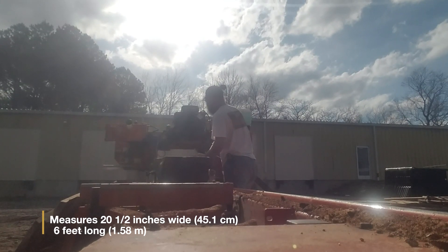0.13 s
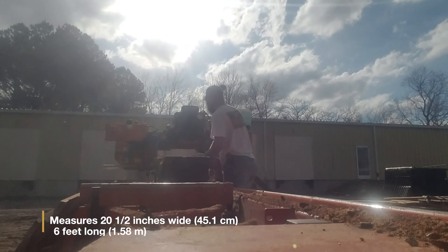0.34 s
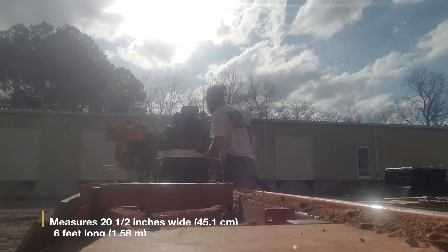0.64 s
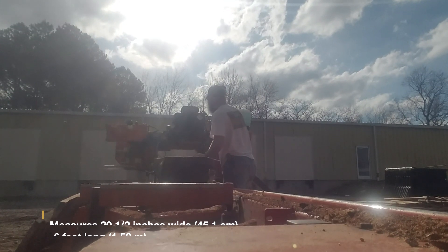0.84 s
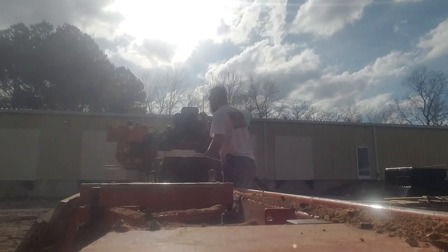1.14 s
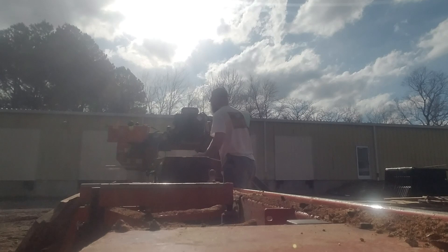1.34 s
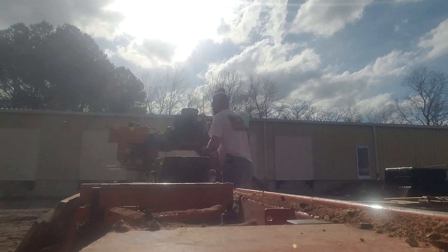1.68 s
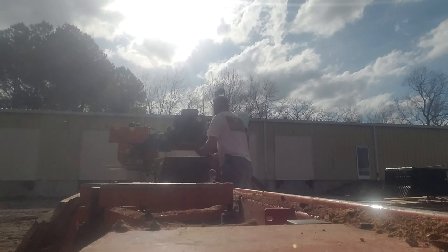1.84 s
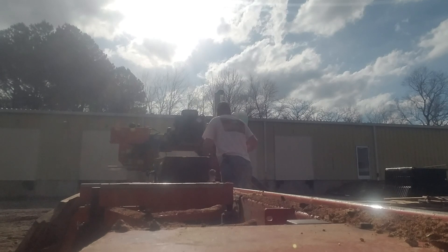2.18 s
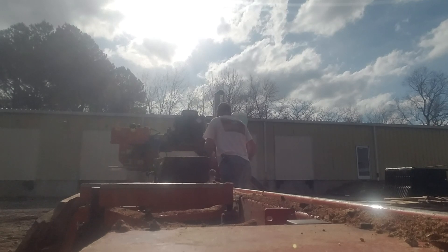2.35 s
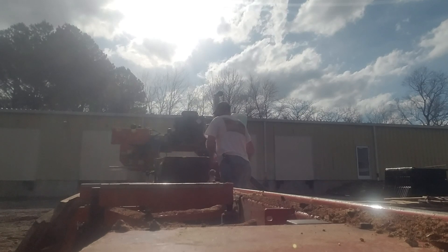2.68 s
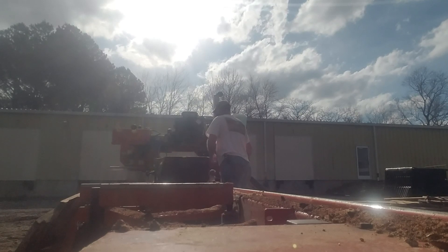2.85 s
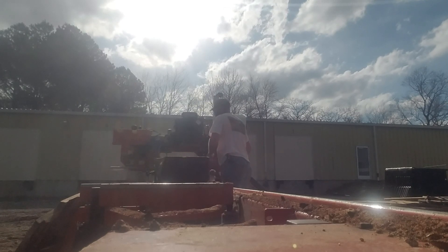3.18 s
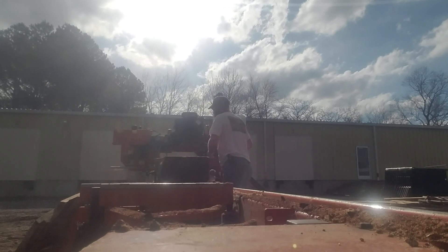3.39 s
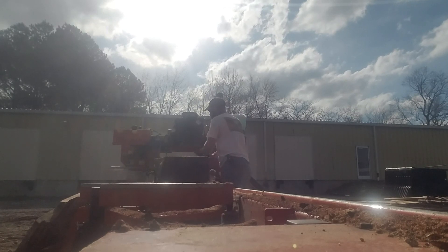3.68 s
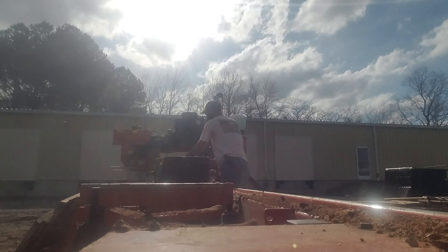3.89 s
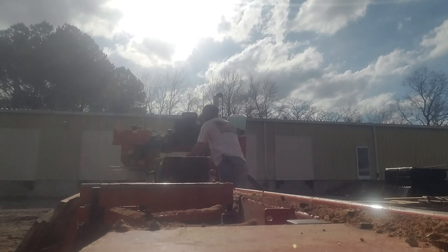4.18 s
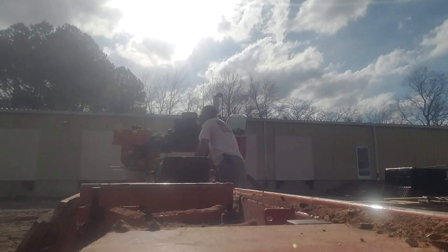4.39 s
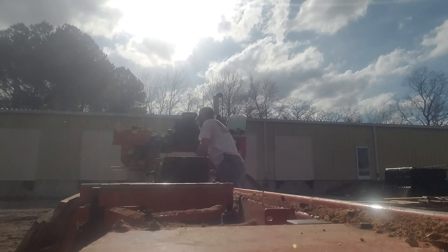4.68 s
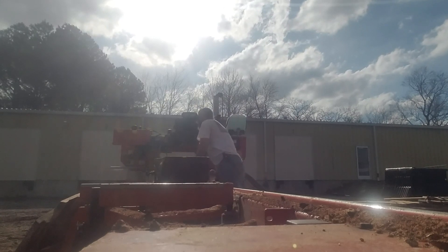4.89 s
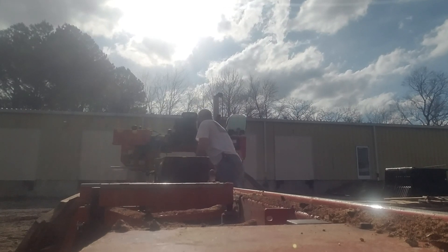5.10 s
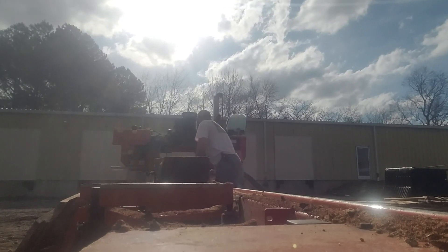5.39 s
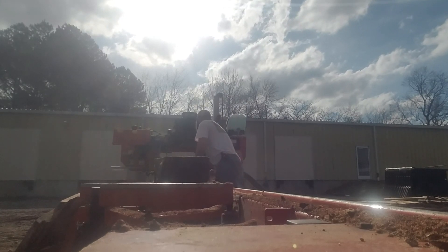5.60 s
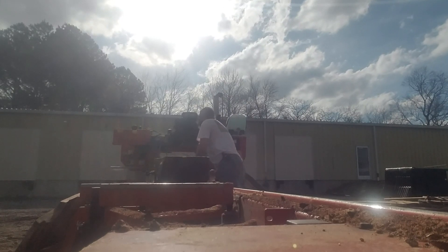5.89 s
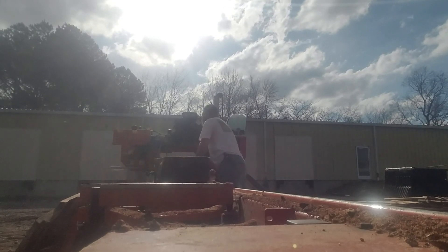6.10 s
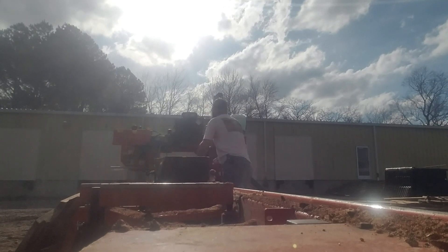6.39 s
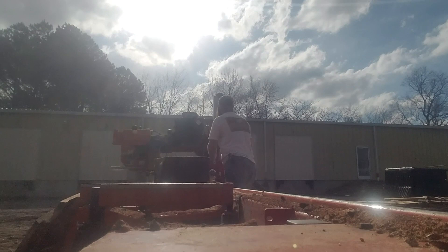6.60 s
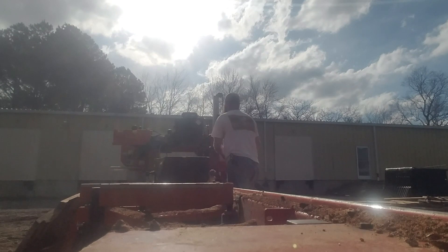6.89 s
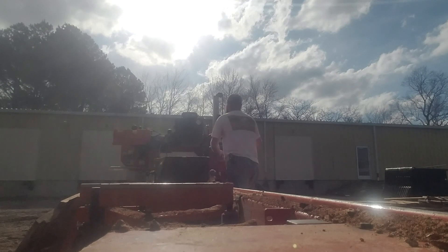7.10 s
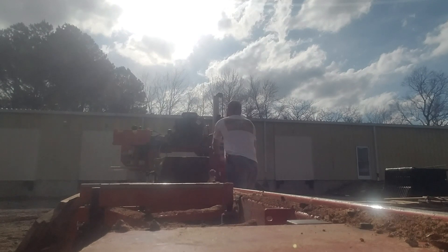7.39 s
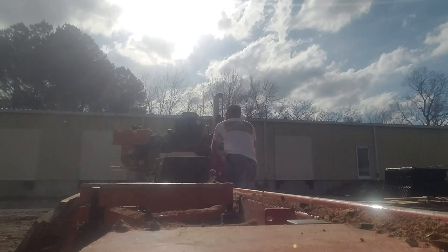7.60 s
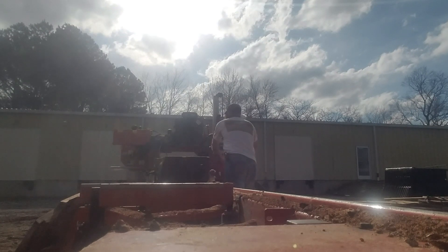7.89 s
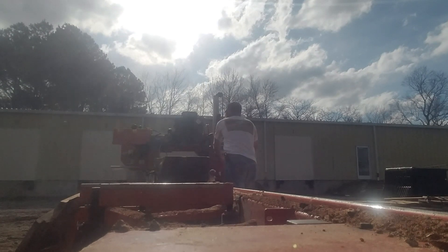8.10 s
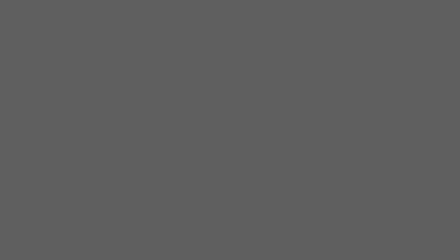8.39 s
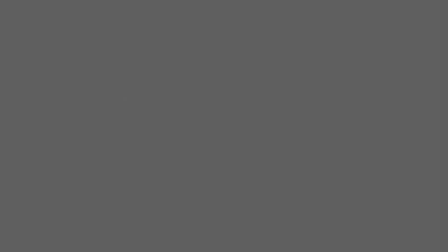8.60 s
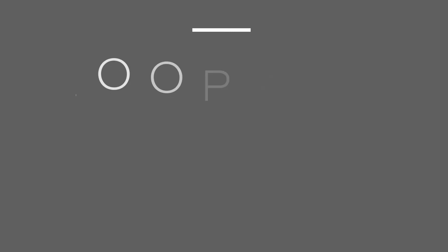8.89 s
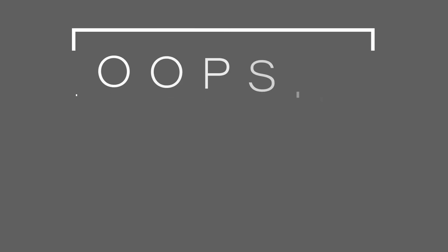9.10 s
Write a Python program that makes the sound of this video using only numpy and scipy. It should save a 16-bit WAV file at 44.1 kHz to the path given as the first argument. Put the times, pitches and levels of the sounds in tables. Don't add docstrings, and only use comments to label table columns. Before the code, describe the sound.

A small two-cylinder engine is already running hard outdoors, close to a compact stereo microphone: fluttering low exhaust, buzzing mid-range whine and broad airy roar. From 0 to 0.6 s its pitch sags slightly; hollow steel knocks rattle around 0.3 s and again near 0.65 s. It then surges, peaking about 1.1 s, while the blade enters the log and a bright sizzling hiss with coarser woody rasp grows. The throttle eases between 1.45 and 1.9 s and the pitch sinks until about 2.65 s, with short thin squeals near 1, 2.15 and 3.4 s. It climbs gently to 4.8 s, then holds nearly steady, with faint blade ringing. Teeth catch briefly around 5.3 s. Hiss strengthens near 7.1 s; the engine droops slightly from 8 s. A deeper knock lands at 8.3 s, and everything stops instantly at 8.34 s, leaving silence.

```python
import sys
import numpy as np
from scipy import signal
from scipy.fft import rfft, irfft, next_fast_len
from scipy.io import wavfile

SR = 44100
rng = np.random.default_rng(int(sys.argv[2]) if len(sys.argv) > 2 else 0)


def convert_level_to_amplitude(level_db):
    exponent = np.asarray(level_db, float) / 20
    return 10 ** exponent


def log_audio(samples):
    frames = np.atleast_2d(samples).T
    limited = np.clip(frames, -1, 1)
    pcm = np.round(limited * 32767).astype(np.int16)
    wavfile.write(sys.argv[1], SR, pcm)


N = 407921
SIZE = next_fast_len(N)


def rms_one(x):
    return x / np.sqrt(np.mean(x ** 2) + 1e-20)


def in_time(rows):
    s, values = np.transpose(rows)
    return np.interp(np.arange(N) / SR, s, values)


def drift(rate):
    r = np.exp(-80 * np.pi * rate / SR)
    noise = rng.standard_normal(N // 40 + 2002)
    slow = signal.lfilter([1], [1, -2 * r, r * r], noise)[2000:]
    return np.interp(np.arange(N) / 40, np.arange(len(slow)), rms_one(slow))


def port_table(levels, ports):
    hz = np.fft.rfftfreq(SIZE, 1 / SR) + 1e-3

    def read(table, column):
        rows = np.array(table)
        return np.interp(np.log(hz), np.log(rows[:, 0]), rows[:, column])

    return hz, read(levels, 1), read(levels, 2), read(ports, 1), read(ports, 2)


def to_ports(x, levels, ports):
    hz, left_db, right_db, alike, lead = port_table(levels, ports)
    tilt = convert_level_to_amplitude((left_db - right_db) / 2)
    return irfft(rfft(x, SIZE) * [tilt, np.exp(1j * lead) / tilt], SIZE)[:, :N]


def port_noise(levels, ports, edges_hz, patchy_db, gust_db, modes_db, diffuse, count):
    hz, left_db, right_db, alike, lead = port_table(levels, ports)
    alike = alike ** diffuse
    shared, own = rfft(rng.standard_normal((2, SIZE)))

    grid = np.arange(0, SR / 2 + 99, 45.)
    forest = []
    for _ in range(3):
        heights = np.minimum(rng.exponential(1, len(grid)), 2.6)
        forest.append(modes_db * np.interp(hz, grid, heights))
    left = convert_level_to_amplitude(left_db + forest[0] + 0.65 * forest[1]) * shared
    mixed = alike * np.exp(1j * lead) * shared + np.sqrt(1 - alike ** 2) * own
    right = convert_level_to_amplitude(right_db + forest[0] + 0.8 * forest[2]) * mixed

    low_hz, high_hz = edges_hz
    place = np.log(hz / low_hz) / np.log(high_hz / low_hz) * count
    out, gust = 0, gust_db * drift(4.3)
    for k in range(count + 1):
        window = np.clip(1 - abs(place - k), 0, 1) * (place > 0) * (place < count)
        band = irfft(window * [left, right], SIZE)[:, :N]
        out = out + convert_level_to_amplitude(gust + patchy_db * drift(8.1)) * band
    return out / np.sqrt(np.mean(out.mean(axis=0) ** 2))


# (t/s, level/dB)
FEED = [(0, -35), (.69, -35.5), (.76, -32.5), (1.16, -29.5), (2.13, -32), (2.85, -33.5), (3.3, -33),
        (5.2, -35.5), (6.2, -35), (7.1, -31), (7.4, -32), (8.33, -32)]
# (t/s, level/dB)
KNOTS = [
    (2.18, 1),
    (5.24, 3),
    (5.36, 4),
    (8.33, 1),
]


def load():
    t = np.arange(N) / SR
    throttle_db = 10 * np.clip(1 - (t - 1.45) / .43, 0, 1)
    free = np.clip(1 - (t - .79) / .8, 0, 1)
    catch_db = sum(db * np.clip(1 - abs(t - s) / .044, 0, 1) for s, db in KNOTS)
    return throttle_db, free, in_time(FEED) + catch_db


def follow(usual_db, throttle_share, free_db, feed_share):
    throttle_db, free, feed_db = load()
    return usual_db + throttle_share * throttle_db + free_db * free + feed_share * (feed_db + 33)


# (t/s, cycles per second)
SPEED = [(0, 26.72), (.2, 26.64), (.38, 26.3), (.62, 26.12), (.88, 27.8), (1.0, 28.5), (1.12, 28.78),
         (2.0, 27.16), (2.3, 26.81), (2.65, 26.55), (3.2, 26.84), (4.1, 27.62), (4.8, 28.02), (5.6, 27.65),
         (6.2, 27.47), (7.7, 27.38), (8.0, 27.16), (8.3, 26.75)]
# (multiple of the cycle, level/dB)
NOTES = [(2, -35.5), (14, -39), (16, -35.5), (17, -40.5), (18, -42.5), (19, -43), (20, -38), (22, -44),
         (28, -41.5), (29, -41), (32, -35), (39, -40), (40, -35), (42, -34), (43, -40.5), (44, -33.5),
         (46, -39), (48, -39)]
# (multiple of the cycle, level/dB)
QUIET_NOTES = [(1, -50.5), (7, -46.5), (11, -43), (15, -45.5), (25, -58), (31, -45), (45, -47.5),
               (55, -49.5)]
# (f/Hz, offset for 6 dB less/Hz, level/dB, share of throttle)
PIPE = [(78.85, 3, -33, 0.22), (112.8, 7.5, -33.5, 1.29), (131.7, 9.5, -31.5, .8),
        (162.6, 6.5, -34.5, 1.16)]
# (f/Hz, width/Hz, level/dB)
CASING = [(257, 6, 5), (278.4, 5.9, 3), (394.5, 14, 12), (441.2, 9.6, 8.5), (885, 28, 8), (1070, 20, -2),
          (1156, 20, 3.5), (1184, 25, 0.5)]


def engine(unsteady_db, wander_rad, lean_rad):
    step = 8
    cycles_per_s, throttle_db = in_time(SPEED)[::step], load()[0][::step]
    whine_db = follow(.5, -.23, -1, .77)[::step]
    turn = 2 * np.pi * np.cumsum(cycles_per_s) * step / SR
    wobble = [drift(3.1)[::step] for _ in range(12)]
    strong = dict(NOTES)

    out = convert_level_to_amplitude(-33.5 + 0.92 * wobble[0]) * np.cos(5.7 * turn + 0.37 * wobble[1])
    for k in range(1, 59):
        note_hz = k * cycles_per_s
        level_db = strong.get(k, np.interp(k, *np.transpose(QUIET_NOTES)))
        if 3 <= k <= 6:
            hz, off_hz, top_db, share = PIPE[k - 3]
            loss_db = np.minimum(6 * ((note_hz - hz) / off_hz) ** 2, 18.5)
            level_db = top_db + share * throttle_db - loss_db
        if k > 24:
            level_db = level_db + whine_db
        for hz, width_hz, lift_db in CASING:
            lift = lift_db / (1 + (2 * (note_hz - hz) / width_hz) ** 2)
            level_db = level_db + lift - 1.07 * lift.mean()
        start = lean_rad * k * k if k < 8 else rng.uniform(0, 2 * np.pi)
        wander = wander_rad * np.sqrt(k / 4) * wobble[(5 * k + 1) % 12]
        out += convert_level_to_amplitude(level_db + unsteady_db * wobble[k % 12]) * np.cos(k * turn + start + wander)
    return np.sqrt(2) * signal.resample_poly(out, step, 1)[:N]


# (t/s, peak level/dB, f/Hz, time to fall 60 dB/s)
KNOCKS = [
    (.266, -16, 258, .16),
    (.306, -9, 262, .2),
    (.348, -12, 268, .12),
    (.644, -15, 252, .16),
    (.682, -10.5, 272, .16),
    (8.305, -16, 155, .2),
]


def knocks():
    out, t = np.zeros(N), np.arange(SR // 4) / SR
    for s, peak_db, hz, t60 in KNOCKS:
        modes = np.sin(2 * np.pi * hz * t) + convert_level_to_amplitude(-5) * np.sin(2 * np.pi * 1.14 * hz * t)
        out[round(s * SR):][:len(t)] += convert_level_to_amplitude(peak_db - 60 * t / t60) * (1 - np.exp(-t / .003)) * modes
    return out


# (f/Hz, left level/dB, right level/dB)
ENGINE_LEVELS = [(25, -26, -20.5), (55.7, -4.5, -9), (95, -11, -9), (153, -4.5, -4.5), (201, -14, -12),
                 (326, -12, -10.5), (477, -3, -1.5), (713, -11, -11.5), (870, -6.5, -8.5), (1198, -3.5, -8),
                 (1304, -8, -15.5), (1620, -25.5, -11), (1780, -15, -12.5), (2300, -16.5, -15)]
# (f/Hz, likeness 0-1, right leads/rad)
ENGINE_PORTS = [(25, .73, -.1), (55, .73, -.3), (95, .9, -.2), (150, .97, -.2), (470, .98, -.3),
                (680, .94, -.35), (880, .96, -.25), (1150, .98, -.05), (1290, .93, .3), (1420, .75, 1.3),
                (1650, .4, 1.3), (1780, .75, -.9), (2000, .82, -.1), (2300, .79, .9)]


def motor():
    dry_motor = engine(unsteady_db=1.0, wander_rad=.15, lean_rad=.3106) + knocks()
    return to_ports(dry_motor, ENGINE_LEVELS, ENGINE_PORTS)


def engine_roar():
    roar = port_noise(ENGINE_LEVELS, ENGINE_PORTS, (350, 2300), patchy_db=.1, gust_db=.44,
                      modes_db=.88, diffuse=1.64, count=3)
    return convert_level_to_amplitude(follow(-22.5, .1477, 0, 0)) * roar


def rumble():
    low = port_noise(ENGINE_LEVELS, ENGINE_PORTS, (18, 350), patchy_db=.8, gust_db=.76,
                     modes_db=-1.5, diffuse=1.8, count=3)
    return convert_level_to_amplitude(follow(-28.5, .11, 2.5, -.57)) * low


# (f/Hz, left level/dB, right level/dB)
HISS_LEVELS = [(7540, -13, -14.5), (7950, -11, -5), (8500, -10, -3), (9200, -14, -5), (9600, -8, -8.5),
               (10100, -6.5, -13), (10800, -8, -10), (11600, -4.5, -11.5), (12300, -1.5, -8),
               (13000, -0.5, -5), (14000, 0.0, -6), (14840, -2, -7), (15300, -3, -7), (15720, -7.5, -4.5)]
# (f/Hz, likeness 0-1, right leads/rad)
HISS_PORTS = [(7600, 0.54, -0.0), (7950, 0.26, 1.6), (8500, 0.16, 4.4), (9000, 0.6, 3.7), (9600, 0.46, 3.7),
              (10100, 0.3, 5.1), (10800, 0.21, 3.7), (11600, 0.25, 3.3), (12300, 0.19, 1.7),
              (13000, 0.37, 2.2), (14000, 0.35, 1.3), (14700, 0.17, 1.3), (15300, 0.14, 0.7),
              (15700, 0.3, -0.5)]


def tooth_hiss():
    hiss = port_noise(HISS_LEVELS, HISS_PORTS, (7600, 15750), patchy_db=.9, gust_db=.16,
                      modes_db=2.7, diffuse=.83, count=2)
    top = signal.sosfiltfilt(signal.butter(2, 11500, "high", fs=SR, output="sos"), hiss)
    free, feed_db = load()[1:]
    return convert_level_to_amplitude(feed_db - .02) * (hiss - .4 * free ** 2 * top)


# (f/Hz, left level/dB, right level/dB)
RASP_LEVELS = [(2300, -4, 1), (2460, -7.5, -1), (2660, -13.5, -8.5), (2966, -7, -3), (3235, -9, -10.5),
               (3744, -7, -8), (4140, -6, -3), (4670, -7, -1.6), (5350, -5, -5), (5990, -16.5, -12),
               (6430, -9, -14), (6800, -14.5, -20), (7200, -14, -26.5), (7600, -16.5, -18.5)]
# (f/Hz, likeness 0-1, right leads/rad)
RASP_PORTS = [(2300, 0.75, 1.1), (2500, 0.68, 1.9), (2720, 0.79, 3.2), (3000, 0.67, 3.7), (3300, 0.79, 3.4),
              (3600, 0.58, 4.5), (4000, 0.61, 4.8), (4800, 0.6, 4.0), (5400, 0.45, 4.1), (5900, 0.44, 4.4),
              (6400, 0.22, 3.8), (6800, 0.17, 5.8), (7200, 0.11, 6.0), (7600, 0.19, 7.1)]


def cutting_rasp():
    rasp = port_noise(RASP_LEVELS, RASP_PORTS, (2300, 7600), patchy_db=.55, gust_db=.8,
                      modes_db=1.8, diffuse=.7, count=3)
    return convert_level_to_amplitude(follow(-36, -.02, 3, .43)) * rasp


# (t/s, length/s, f/Hz, level/dB)
SQUEALS = [(.98, .2, 4310, -40), (1.98, .12, 4330, -38), (3.3, .1, 4330, -40), (3.45, .18, 4330, -39),
           (2.1, .035, 4330, -32), (2.15, .06, 4330, -28), (2.23, .04, 4330, -40), (3.86, .12, 4870, -37),
           (3.9, .07, 5270, -38), (3.99, .07, 5270, -38), (6.9, .5, 6245, -44), (.44, .14, 700, -30)]


def squeals():
    out = np.zeros(N)
    for s, length, hz, level_db in SQUEALS:
        t = np.arange(round(length * SR)) / SR
        shape = np.sqrt(np.sin(np.pi * t / length))
        out[round(s * SR):][:len(t)] += convert_level_to_amplitude(level_db) * shape * np.sin(2 * np.pi * hz * t)
    return out


# (f/Hz, level/dB)
RINGS = [
    [(4307, -54), (5771, -52), (6239, -59.5), (8210, -51.5), (13087, -52), (14239, -54.5)],
    [(4829, -57), (8210, -55.5), (8899, -61), (11902, -65), (12274, -57), (13119, -59), (13792, -55),
     (14357, -53), (14443, -55), (15493, -57.5)],
    [(4845, -55), (5281, -52), (6245, -63.5), (8446, -56.5), (8904, -53), (11892, -59), (12285, -58.5),
     (13130, -55), (13964, -51.5), (14223, -56), (14438, -53), (14826, -55.5), (15149, -54.5), (15488, -57)],
]
RINGS_AT = [2.4, 4.8, 7.4]


def blade_rings(cut_db, width_hz, swell_db, fade_db):
    out, r, t = 0, np.exp(-np.pi * width_hz / SR), np.arange(N) / SR
    teeth = rng.standard_normal(N)
    swells = [convert_level_to_amplitude(swell_db * drift(1.7)) for _ in range(7)]
    for rings, at in zip(RINGS, RINGS_AT):
        near = convert_level_to_amplitude(cut_db - np.median(cut_db) - fade_db * (t - at) ** 2)
        for k, (hz, level_db) in enumerate(rings):
            poles = [1, -2 * r * np.cos(2 * np.pi * hz / SR), r * r]
            ring = signal.lfilter([1, 0, -1], poles, teeth)
            out = out + convert_level_to_amplitude(level_db + 3.5) * near * swells[k % 7] * rms_one(ring)
    return out


# (f/Hz, left level/dB, right level/dB)
BLADE_LEVELS = [(4300, -3.5, 1), (6200, 0.5, 5), (7200, -0.5, -4.5), (8920, 0.5, 5), (11900, -2, -2),
                (14400, 0.5, -7), (15300, 2, -1)]
# (f/Hz, likeness 0-1, right leads/rad)
BLADE_PORTS = [(700, 1, -.2), (4300, 1, -1.2), (9000, 1, -1.8), (14000, 1, 1.2)]


def blade():
    rings = blade_rings(load()[2], width_hz=25, swell_db=3.0, fade_db=.5)
    return to_ports(rings + squeals(), BLADE_LEVELS, BLADE_PORTS)


def scene():
    powered = motor() + engine_roar() + rumble()
    cutting = tooth_hiss() + cutting_rasp()
    return powered + cutting + blade()


def low_pass(x):
    return signal.sosfilt(signal.butter(12, 15740, fs=SR, output="sos"), x)


def record(dry):
    kept = np.clip((8.3376 - np.arange(N) / SR) / .0005, 0, 1)
    return low_pass(dry * kept)


dry = scene()
out = record(dry)
log_audio(out)
```